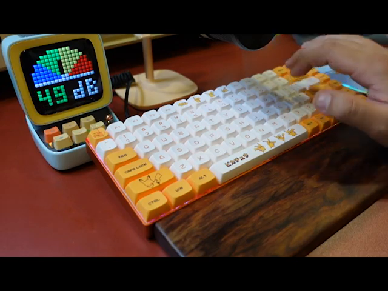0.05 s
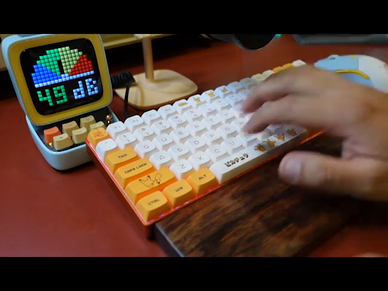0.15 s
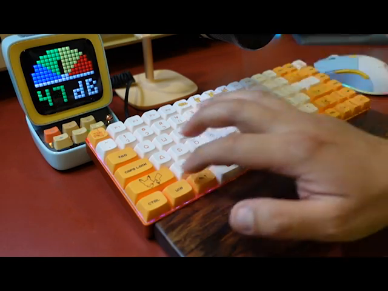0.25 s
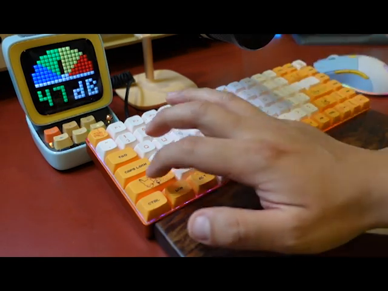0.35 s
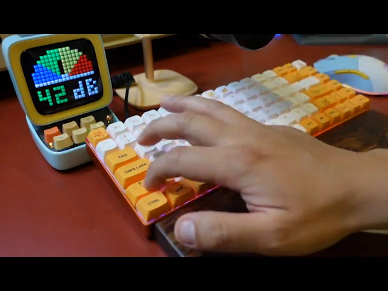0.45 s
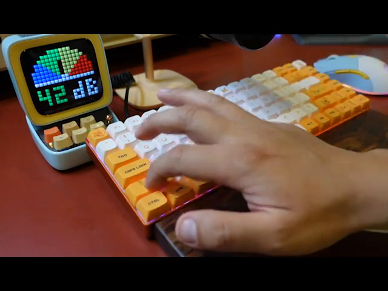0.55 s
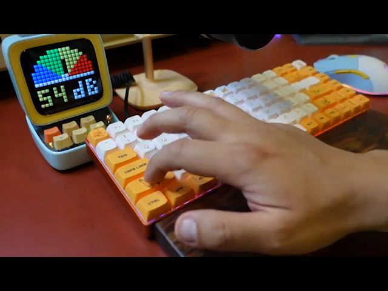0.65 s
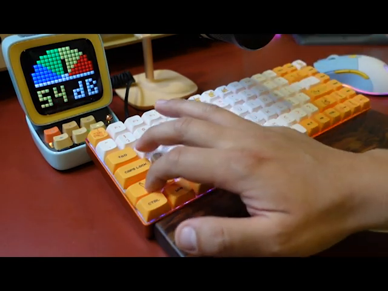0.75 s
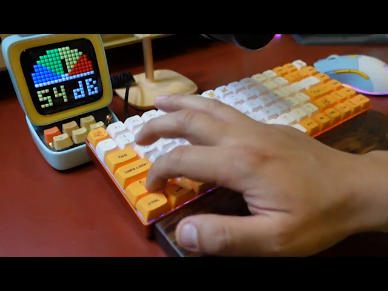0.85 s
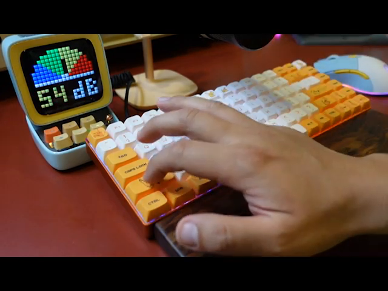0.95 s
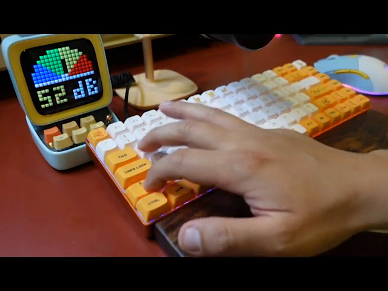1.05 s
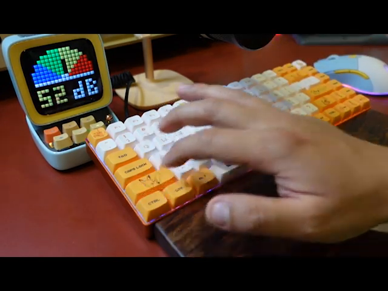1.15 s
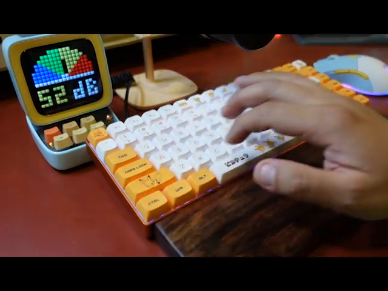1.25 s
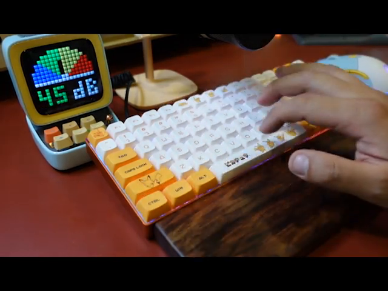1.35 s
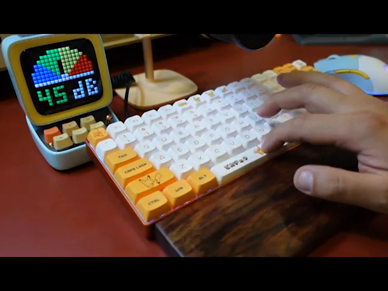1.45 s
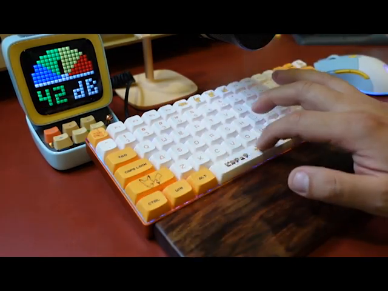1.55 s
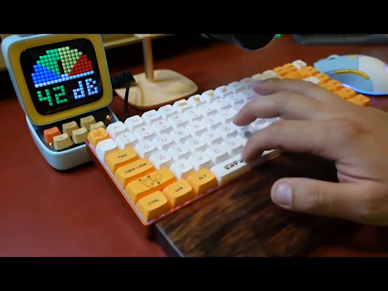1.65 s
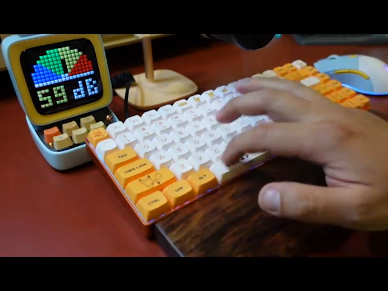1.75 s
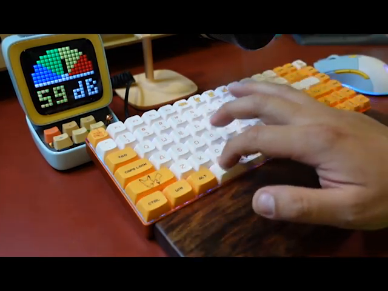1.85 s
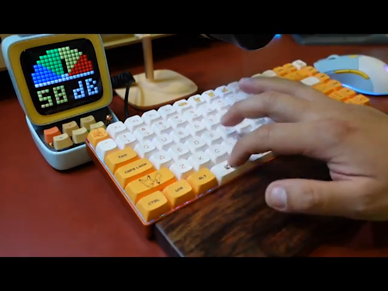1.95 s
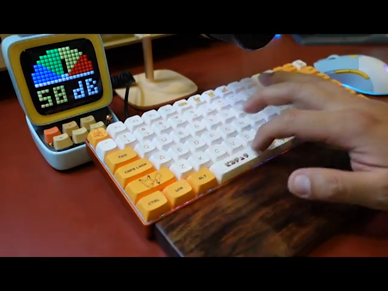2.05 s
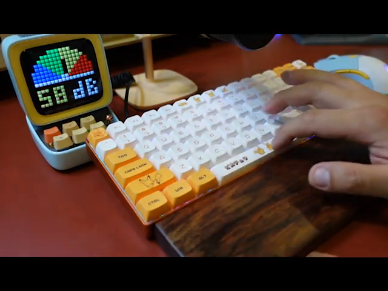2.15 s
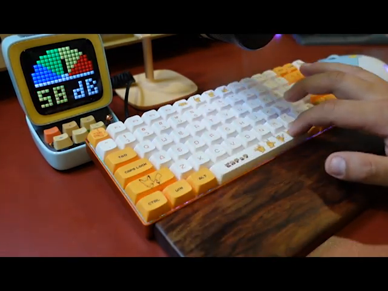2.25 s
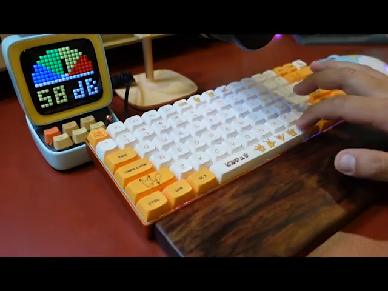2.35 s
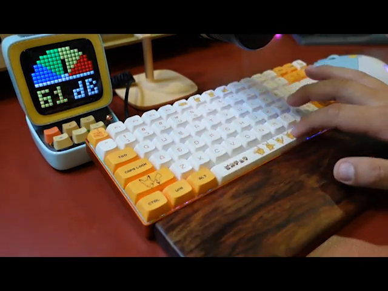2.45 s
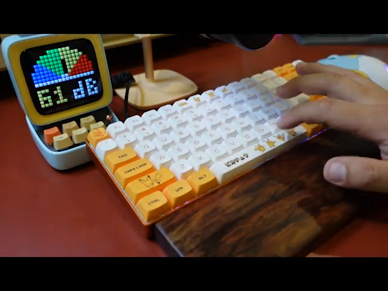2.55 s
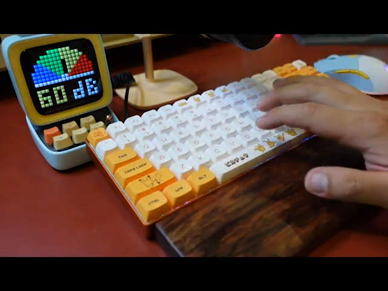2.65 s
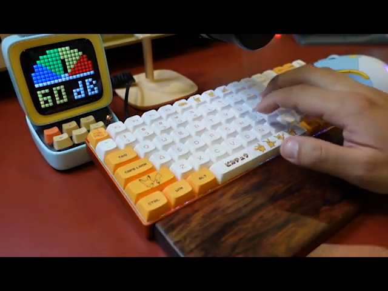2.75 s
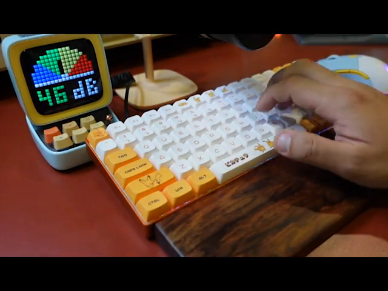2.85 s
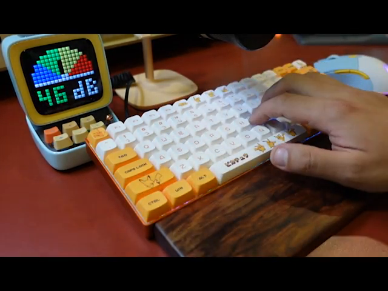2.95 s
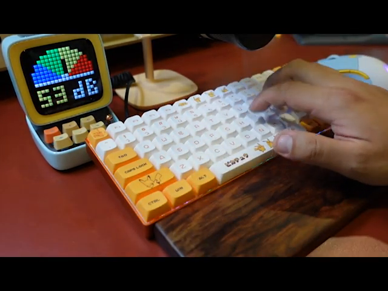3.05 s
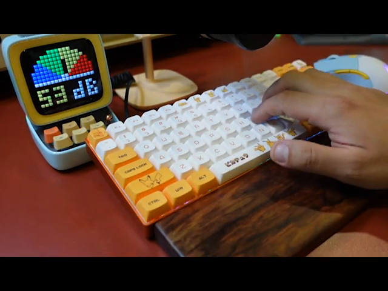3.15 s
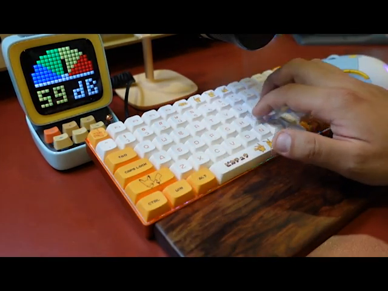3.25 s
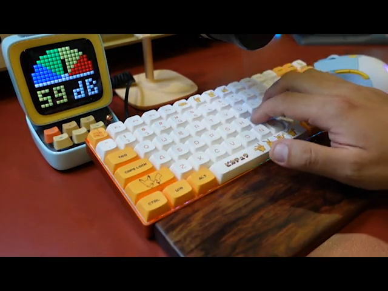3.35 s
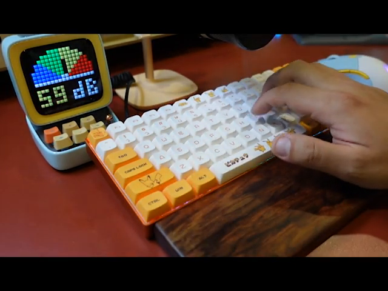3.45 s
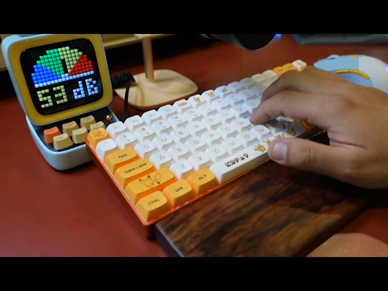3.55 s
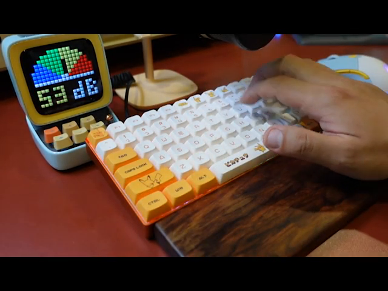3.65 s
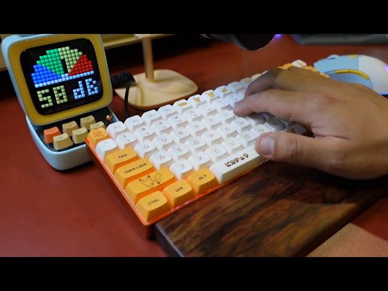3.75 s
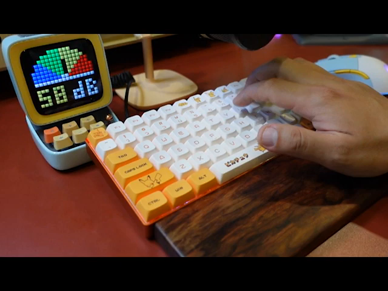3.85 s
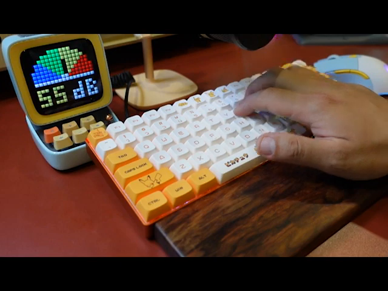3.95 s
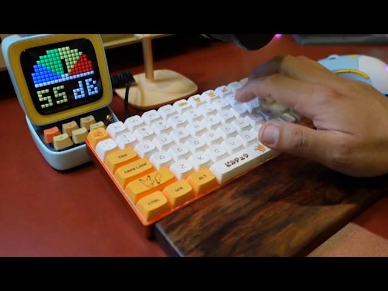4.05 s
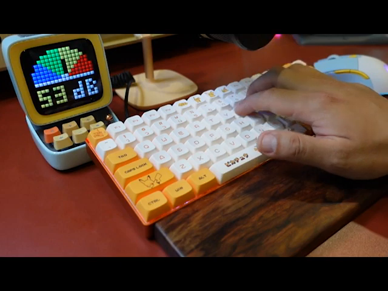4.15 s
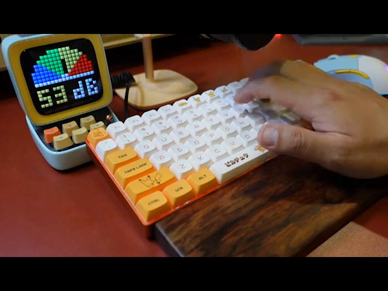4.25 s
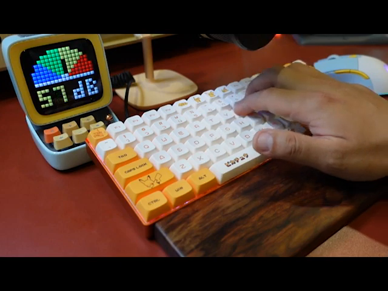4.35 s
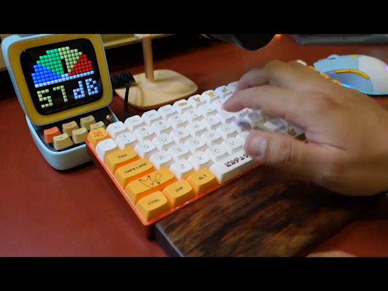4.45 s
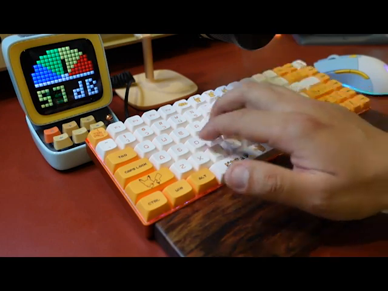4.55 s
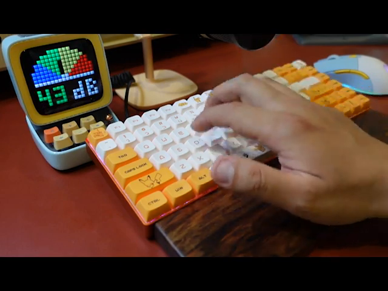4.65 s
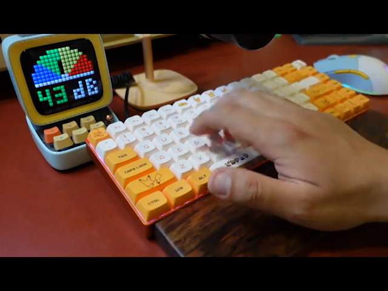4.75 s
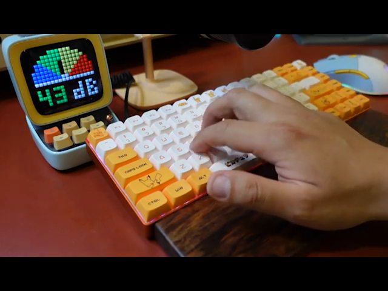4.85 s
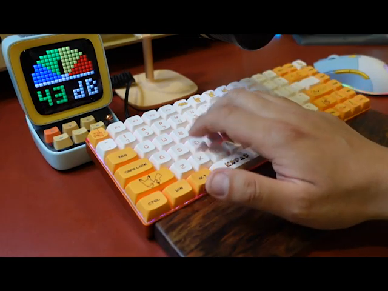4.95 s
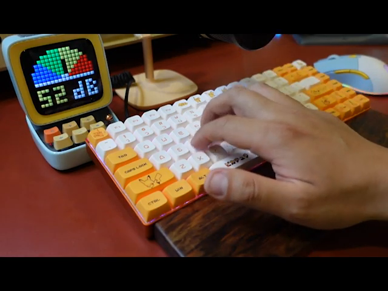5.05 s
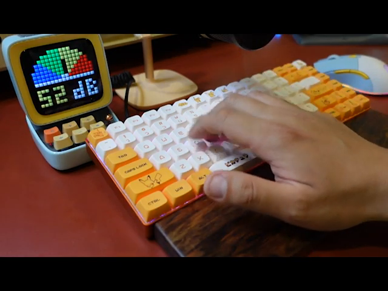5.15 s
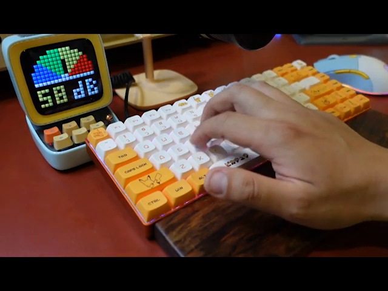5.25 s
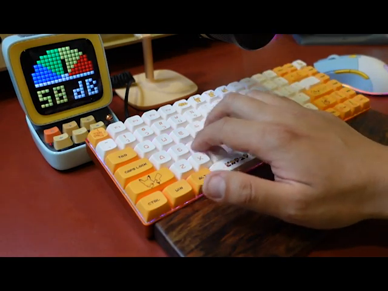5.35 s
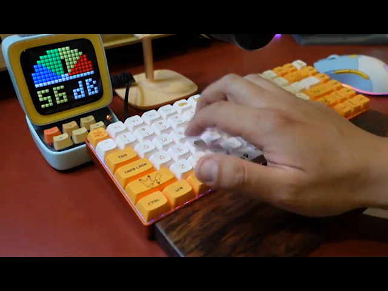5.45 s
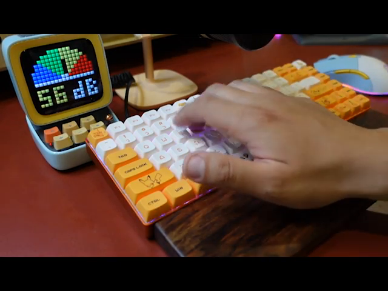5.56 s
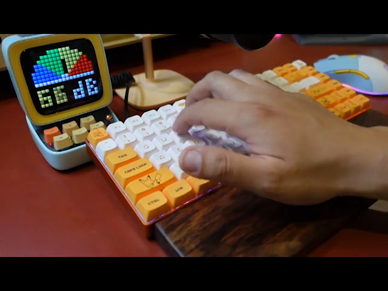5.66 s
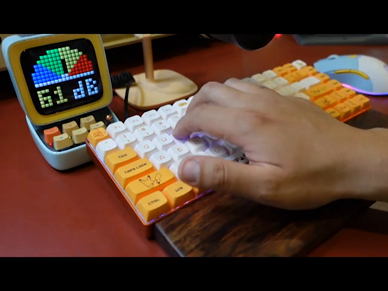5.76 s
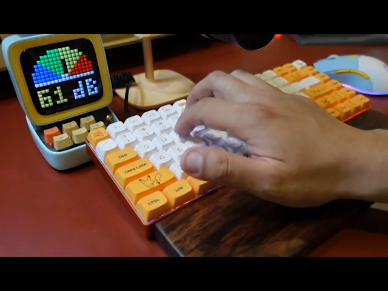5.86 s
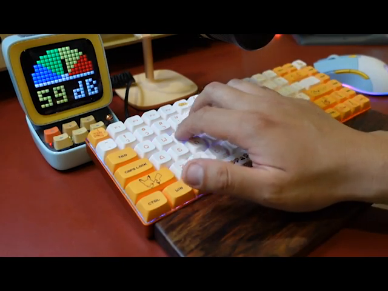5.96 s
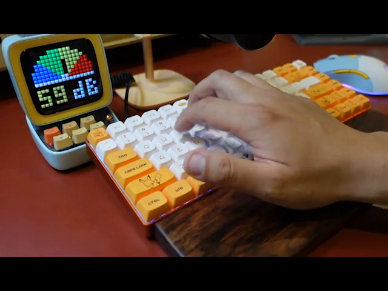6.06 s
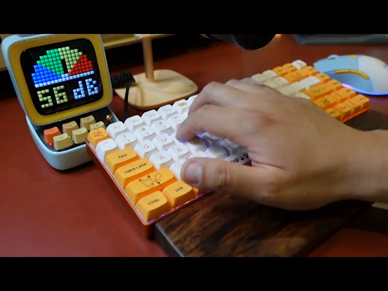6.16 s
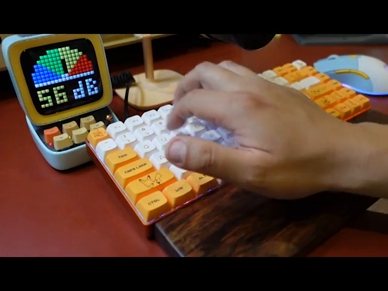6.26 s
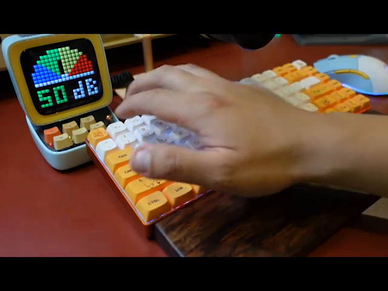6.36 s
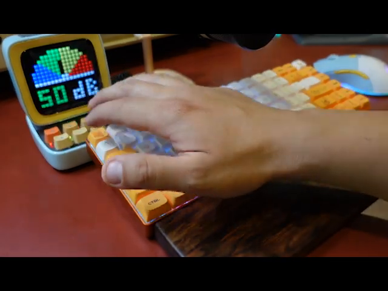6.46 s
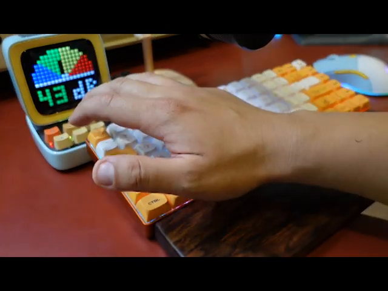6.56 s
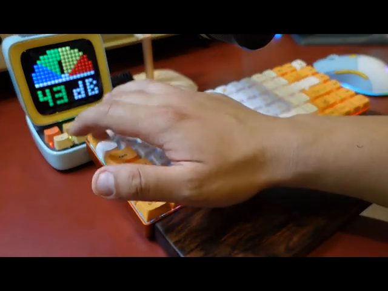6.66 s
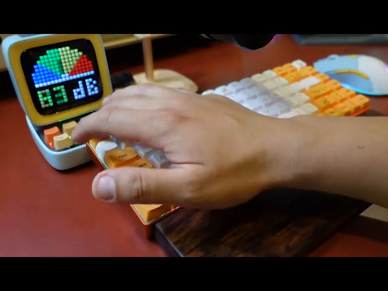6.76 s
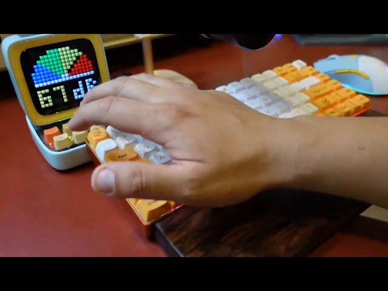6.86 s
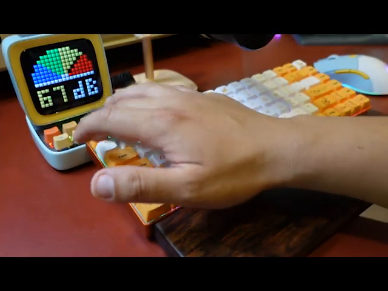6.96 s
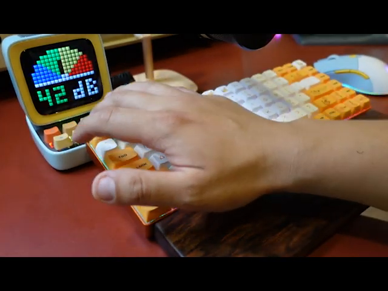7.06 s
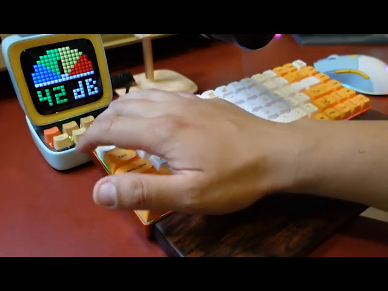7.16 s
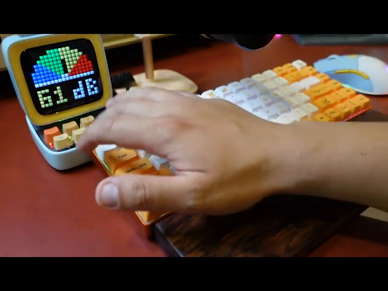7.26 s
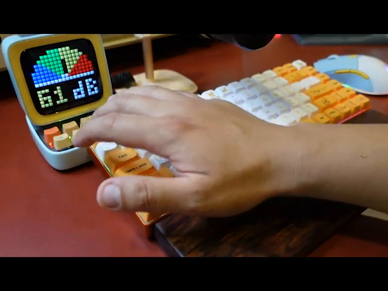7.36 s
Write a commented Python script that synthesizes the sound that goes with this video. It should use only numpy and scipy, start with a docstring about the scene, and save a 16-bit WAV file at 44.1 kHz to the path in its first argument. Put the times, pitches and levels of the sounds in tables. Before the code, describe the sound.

Close, crisp clacks of a mechanical keyboard: five single presses, seven hollow space bar thocks, rapid rolling bursts, then four firm taps.

```python
"""A wooden desk in a small quiet room: one hand taps a mechanical keyboard, close to the microphone.
A modifier key comes first, then the space bar, rolls across the letters, and a corner key.
Every landing and return is a short plastic clack: shaped noise that rings cap, switch spring and case.
Decaying low swings bounce the keyboard on the desk, faintly or firmly; echoes and a low hush fill the room."""
import sys
import numpy as np
from scipy import signal
from scipy.fft import rfft, irfft
from scipy.io import wavfile
from scipy.ndimage import uniform_filter1d

SR = 44100
rng = np.random.default_rng(int(sys.argv[2]) if len(sys.argv) > 2 else 0)


def waveform_to_disk(signal):
    """Save audio, clipped to [-1, 1], as 16-bit WAV at the path in sys.argv[1]."""
    frames = np.transpose(np.atleast_2d(signal))
    scaled = np.clip(frames, -1, 1) * 32767
    samples = np.round(scaled).astype(np.int16)
    wavfile.write(sys.argv[1], SR, samples)


N = 326781
TAPS = 8192  # length of one impact [samples]

# How the small contacts sound, as lifts on the key's body:
# (cap wall [dB], snap [dB], tick [dB], sizzle [dB], cap top [Hz], cap wall [Hz],
#  knock re strength [dB], kind of contact)
SMALL_VOICES = [(-3, -3, 2, 13, 1300, 1750, -15, "graze"),
                (-17, -5.5, -3, -7.5, 1160, 2200, -10, "bar end")]


def amp(db):
    """Decibels to gain."""
    return 10 ** (np.asarray(db) / 20)


def read(points, hz):
    """A table of (frequency [Hz], value), joined by lines on a log-frequency axis."""
    f, value = np.transpose(points)
    return np.interp(np.log(hz + 1), np.log(f + 1), value)


def unit(x):
    """Scales a sound to energy 1."""
    return x / np.sqrt(np.sum(x ** 2) + 1e-20)


def add(mix, s, sound):
    """Mixes a sound in at time s."""
    part = mix[max(round(s * SR), 0):][:len(sound)]
    part += sound[:len(part)]


def bell(hz, centre_hz, width_hz):
    """The shape of one resonance, 1 at its centre."""
    return 1 / (1 + ((hz - centre_hz) / width_hz) ** 2)


def causal(db):
    """The minimum-phase response with these gains: a sharp front, ringing behind it."""
    cepstrum = irfft(np.log(amp(np.maximum(db, -100))))
    # fold the cepstrum onto positive time
    cepstrum[1:TAPS // 2] *= 2
    cepstrum[TAPS // 2 + 1:] = 0
    return np.exp(rfft(cepstrum))


def burst(t60, rise_s=1e-5):
    """Dying noise of energy 1: a crowd of small modes or rattles."""
    t = np.arange(TAPS) / SR
    envelope = amp(-60 * t / t60) * (1 - np.exp(-t / rise_s))
    return unit(rng.standard_normal(TAPS) * envelope)


def hush():
    """Low steady noise of the room: random noise given a fixed spectrum."""
    # spectrum of the hush: (frequency [Hz], relative level [dB per Hz])
    hush_colour = [(12, -40.5), (20, 0), (101, -6.5), (158, -14.5), (198, -5.5), (222, -12.5), (357, -21.5),
                   (410, -16.5), (446, -25.5), (485, -17), (678, -17.5), (738, -20.5), (2260, -28),
                   (4940, -45.5), (16000, -49.5)]
    level_db = -53  # rms
    hz = np.fft.rfftfreq(N, 1 / SR)
    noise = irfft(rfft(rng.standard_normal(N)) * amp(read(hush_colour, hz)), N)
    return amp(level_db) * np.sqrt(N) * unit(noise)


def opening_ring(thump_db, thump_hz, thump_t60, air_db, air_t60):
    """Desk and room still ring from a stroke just before the scene opens: a dying tone and dying noise."""
    t = np.arange(N) / SR
    band = signal.butter(1, [300, 3000], "bandpass", fs=SR, output="sos")
    air = signal.sosfilt(band, rng.standard_normal(N))
    air = signal.sosfilt(signal.butter(2, 4500, fs=SR, output="sos"), air)
    thump = amp(thump_db - 60 * t / thump_t60) * np.sin(2 * np.pi * thump_hz * t)
    return thump + amp(air_db - 60 * t / air_t60) * air


def of_key(table, key):
    """The numbers that a table holds for one key."""
    return next(row[:-1] for row in table if row[-1] == key)


def impact(s, strength_db, hardness_db, thump_db, voice, key):
    """One contact from voice and force: (time, clack's level, colour and pitches, knock, thump)."""
    # the switch under each key: (spring [Hz], contact leaf [Hz], key)
    switches = [(3490, 11500, "modifier"), (2760, 11100, "space"), (6730, 11000, "corner"),
                (8000, 11100, "letter 1a"), (8280, 11850, "letter 1b"), (6980, 10950, "letter 1c"),
                (8060, 11550, "letter 2a"), (8400, 11700, "letter 2b"), (8270, 11800, "letter 2c"),
                (8200, 11400, "letter 3a"), (7400, 10810, "letter 3b"), (8270, 11600, "letter 3c"),
                (8230, 11780, "letter 4a"), (8220, 11400, "letter 4b"), (8200, 11400, "letter 4c")]
    # the finger never meets the same spot twice: scatter of cap pitch [share] and colour [dB]
    spot_detune, spot_db = .015, .8
    *colour_db, top_hz, wall_hz, knock_db = voice
    # a hard stroke lifts the treble fully, the cap wall only in part
    hardness_share = np.array([.3, 1, 1, 1])
    colour_db = np.add(colour_db, hardness_db * hardness_share)
    colour_db = colour_db + spot_db * rng.standard_normal(len(colour_db))
    cap_hz = np.array([top_hz, wall_hz]) * (1 + spot_detune * rng.standard_normal(2))
    knock_db = strength_db + knock_db + hardness_db / 2
    return s, strength_db, *colour_db, *cap_hz, *of_key(switches, key), knock_db, thump_db


def typing(kind, return_thump_db, graze_thump_db=-32):
    """Contacts of one kind of key: each stroke bottoms out and springs back; some follow a nail's graze."""
    # Keystrokes. Three fingers roll over letters a, b, c, four times in each of four hand positions:
    # (time [s], strength [dB], hardness [dB], relative desk thump [dB],
    #  return time [s], return strength [dB], key)
    strokes = [(.4195, 10.5, 2, -28, .4961, 7, "modifier"), (.5666, 13, 2, -25.5, .6461, 8, "modifier"),
               (.72, 11, -2, -28, .7966, 7.5, "modifier"), (.871, 9, -1, -29.5, .9374, 7.5, "modifier"),
               (1.0039, 13, 0, -25.5, 1.0894, 10, "modifier"), (1.4562, 10, -3, -23.5, 1.541, 5, "space"),
               (1.6325, 9, -3.5, -22, 1.6942, 10, "space"), (1.7837, 8.5, 9, -21, 1.8663, 8.5, "space"),
               (1.9462, 9.5, 3, -22.5, 2.0361, 9, "space"), (2.1243, 9.5, -2.5, -22, 2.1969, 6, "space"),
               (2.2777, 11, -3.5, -24, 2.348, 6, "space"), (2.4405, 11, 3, -20, 2.5218, 8, "space"),
               (2.8909, 14, -2, -34, 2.9872, 5.5, "letter 1a"),
               (2.9098, 10.5, 2, -26, 3.0066, 5, "letter 1b"),
               (2.9386, 14.5, -2, -30, 3.0293, 13.5, "letter 1c"),
               (3.099, 13.5, -2, -27, 3.185, 13, "letter 1a"),
               (3.1224, 9.5, 3, -24.5, 3.1973, 6.5, "letter 1b"),
               (3.1422, 19, 2, -30, 3.2401, 10.5, "letter 1c"),
               (3.3068, 14.5, 0, -29, 3.3801, 12, "letter 1a"),
               (3.318, 12, -3, -26, 3.393, 6.5, "letter 1b"),
               (3.349, 13, -1.5, -31.5, 3.423, 9, "letter 1c"),
               (3.4837, 15.5, 4, -31.5, 3.5666, 11, "letter 1a"),
               (3.4989, 10.5, -1.5, -30.5, 3.5819, 5.5, "letter 1b"),
               (3.527, 17.5, 0, -24, 3.619, 11, "letter 1c"),
               (3.704, 12.5, -1, -35, 3.7808, 12, "letter 2a"),
               (3.725, 7.5, 2, -26, 3.8031, 6.5, "letter 2b"),
               (3.7507, 14.5, 0, -26.5, 3.8243, 9, "letter 2c"),
               (3.9036, 10.5, -3, -30, 3.9698, 8.5, "letter 2a"),
               (3.9168, 2.5, 1, -33, 3.9862, 8.5, "letter 2b"),
               (3.9309, 17, 1, -23.5, 4.007, 11.5, "letter 2c"),
               (4.096, 12, 2, -37, 4.1677, 12.5, "letter 2a"),
               (4.1129, 8.5, 1, -26.5, 4.1798, 5.5, "letter 2b"),
               (4.1379, 10.5, 0, -28, 4.2065, 9, "letter 2c"),
               (4.2785, 13.5, 1, -30.5, 4.3542, 9, "letter 2a"),
               (4.2914, 8.5, -5, -38, 4.3654, 4, "letter 2b"),
               (4.313, 17.5, -.5, -26, 4.3926, 10, "letter 2c"),
               (4.7497, 8.5, 1, -30.5, 4.8336, 7.5, "letter 3a"),
               (4.778, 14.5, -1, -33, 4.8547, 6.5, "letter 3b"),
               (4.798, 4.5, -6, -33, 4.8694, 9, "letter 3c"),
               (4.9596, 5.5, 1, -37.5, 5.0258, 7.5, "letter 3a"),
               (4.9782, 11, 1, -25.5, 5.0358, 9, "letter 3b"),
               (4.9887, 16, 1, -27, 5.0647, 13, "letter 3c"), (5.148, 5, -4, -27, 5.2145, 9, "letter 3a"),
               (5.161, 14.5, -1, -39, 5.227, 12.5, "letter 3b"),
               (5.1898, 10.5, -1, -41, 5.247, 12.5, "letter 3c"),
               (5.3214, 5.5, 1, -30, 5.405, 6, "letter 3a"), (5.339, 11, 1, -32, 5.414, 11, "letter 3b"),
               (5.359, 15, 5, -27, 5.439, 14, "letter 3c"), (5.5405, 10, 2.5, -29, 5.6187, 7, "letter 4a"),
               (5.5556, 12, 2, -24.5, 5.6325, 9.5, "letter 4b"),
               (5.5837, 8, -3.5, -29.5, 5.6458, 7, "letter 4c"),
               (5.7334, 5.5, -1.5, -40, 5.8092, 8, "letter 4a"),
               (5.7426, 11, 0, -25, 5.822, 10.5, "letter 4b"), (5.7635, 13, 4, -32, 5.8407, 3, "letter 4c"),
               (5.926, 7, 1, -42, 5.9974, 9.5, "letter 4a"),
               (5.9362, 11, -1.5, -24, 6.0062, 9, "letter 4b"),
               (5.9573, 6, -3.5, -36, 6.0284, 9, "letter 4c"),
               (6.1036, 9.5, -1.5, -31, 6.1891, 7.5, "letter 4a"),
               (6.1216, 5, -11, -61, 6.2036, 8.5, "letter 4b"),
               (6.1429, 11.5, 3.5, -23.5, 6.2324, 6.5, "letter 4c"),
               (6.6776, 18.5, 0, -35.5, 6.7623, 9.5, "corner"),
               (6.9581, 20.5, 1.5, -33.5, 7.0306, 8.5, "corner"),
               (7.1131, 14, -2, -39, 7.1809, 10.5, "corner"), (7.2699, 18, 0, -33, 7.3392, 12.5, "corner")]
    # a fingernail grazes a cap before the stroke: (time [s], strength [dB], key)
    grazes = [(1.7716, -11, "space"), (2.2561, -11, "space"), (2.4262, -7, "space"),
              (3.1337, -5, "letter 1c"), (3.2915, -9, "letter 1a"), (3.3346, -8, "letter 1c"),
              (3.4715, -8, "letter 1a"), (3.5156, -9, "letter 1c"), (4.7352, -5, "letter 3a"),
              (4.7655, -10, "letter 3b"), (4.9416, -6, "letter 3a"), (5.3037, -5, "letter 3a"),
              (5.3487, -8, "letter 3c"), (6.6698, -9, "corner")]
    # how each key sounds as it bottoms out, as lifts on its body:
    # (cap wall [dB], snap [dB], tick [dB], sizzle [dB], cap top [Hz], cap wall [Hz],
    #  knock re strength [dB], key)
    down_voices = [(3.5, 7, 1.5, 4, 1170, 1950, -24, "modifier"),
                   (1.5, 5.5, 5, 1.5, 1560, 1895, -12.5, "space"),
                   (4, 1.5, -.5, 0, 1232, 1910, -40, "corner"),
                   (-7, 3.5, -5, -9, 1135, 2150, -34, "letter 1a"),
                   (2, 12, 7.5, 6.5, 1210, 2200, -25, "letter 1b"),
                   (-3, 0, 1, -1, 1230, 2210, -34, "letter 1c"), (2, 2, 1, 3, 1055, 2170, -32, "letter 2a"),
                   (0, 9.5, -6, 3, 1015, 2140, -20, "letter 2b"),
                   (3, 3, 3.5, 7, 1200, 2090, -33, "letter 2c"),
                   (2, 2, -8, -1.5, 1330, 2250, -27, "letter 3a"),
                   (.5, 3, 4, 4, 1095, 2330, -38, "letter 3b"),
                   (-5, -5, -7, -8, 1425, 1880, -36, "letter 3c"),
                   (6, 7, 6, 8, 1150, 2200, -27, "letter 4a"),
                   (7.5, 8, 8, 11, 1130, 2220, -28, "letter 4b"),
                   (3, 10, 7, 8, 1020, 2100, -29, "letter 4c")]
    # as it springs back against its top stop:
    # (cap wall [dB], snap [dB], tick [dB], sizzle [dB], cap top [Hz], cap wall [Hz],
    #  knock re strength [dB], key)
    up_voices = [(2, 1.5, -2, -1.5, 1190, 1950, -17, "modifier"), (.5, 5, 0, 0, 1130, 2300, -9.5, "space"),
                 (.5, 1.5, 0, .5, 1310, 1905, -32, "corner"),
                 (-16, -8, -6, -14, 1080, 1900, -33, "letter 1a"),
                 (.5, 1, 0, 2, 1190, 2190, -26, "letter 1b"), (1, 1, -1, 1, 1290, 2190, -26, "letter 1c"),
                 (-1, -11, 0, -2, 1075, 2100, -32, "letter 2a"),
                 (2.5, 1, 5, 4.5, 1050, 2080, -24, "letter 2b"),
                 (.5, -1, 1.5, 5, 1160, 1990, -26.5, "letter 2c"),
                 (1.5, 5, 4, 6, 1330, 2220, -28, "letter 3a"),
                 (-5, -7, -5.5, -9, 1065, 2200, -31, "letter 3b"),
                 (-4.5, -5.5, -4, -10.5, 1420, 1830, -41, "letter 3c"),
                 (4.5, 2.5, 4, 5.5, 1080, 2130, -31, "letter 4a"),
                 (3, 1, 2, -3, 1085, 2200, -37, "letter 4b"), (0, 2.5, 0, -3, 1050, 2200, -29, "letter 4c")]
    hits = []
    for s, strength_db, hardness_db, thump_db, up_s, up_db, key in strokes:
        if key.startswith(kind):
            hits.append(impact(s, strength_db, hardness_db, thump_db, of_key(down_voices, key), key))
            hits.append(impact(up_s, up_db, 0, up_db + return_thump_db, of_key(up_voices, key), key))
    for s, db, key in grazes:
        if key.startswith(kind):
            hits.append(impact(s, db, 0, db + graze_thump_db, of_key(SMALL_VOICES, "graze"), key))
    return hits


def bar_ends():
    """The dull second stop of the long space bar, after its near end has returned."""
    # the far end stops a moment after the near end:
    # (time [s], strength [dB], relative desk thump [dB])
    end_stops = [(1.5455, 0, -44.5), (1.7069, 7, -21.5), (1.8733, 1.5, -19.5), (2.0434, -3, -20),
                 (2.208, 2, -24), (2.3605, 5, -28), (2.535, 6, -26.5)]
    voice = of_key(SMALL_VOICES, "bar end")
    return [impact(s, db, 0, thump_db, voice, "space") for s, db, thump_db in end_stops]


def contact(chatter_db, chatter_t60, ring_db, ring_t60, rebound_db=-9, rebound_s=0.001276):
    """Spectrum of one impact: blow, rebound, stem chatter, plate ringing on. Flat on average."""
    force = amp(chatter_db) * burst(chatter_t60) + amp(ring_db) * burst(ring_t60)
    force[0] += 1  # the blow
    # the tilted cap lands on one edge, then on the other
    add(force, rebound_s * rng.uniform(.4, 1.626), amp(rebound_db + chatter_db) * burst(0.0028))
    z = rfft(force)
    power = uniform_filter1d(abs(z) ** 2, size=110)
    return z * causal(-10 * np.log10(power))


def clack(row, body, touch, spring_db, spring_t60, spring_width_hz, shimmer_db, slide_db):
    """One impact on a key: body-coloured noise with a spring ping, and the stem's faint slide before it."""
    strength_db, wall_db, snap_db, tick_db, sizzle_db, top_hz, wall_hz, spring_hz, leaf_hz = row
    hz = np.fft.rfftfreq(TAPS, 1 / SR)
    # a hard, square hit is brighter than a soft or glancing one
    hardness = [(1400, 0), (2000, wall_db), (2500, wall_db), (3400, snap_db), (5000, snap_db),
                (7000, tick_db), (9000, tick_db), (11000, sizzle_db - 1.5), (15000, sizzle_db + 9)]
    leaf = bell(hz, leaf_hz, 350)
    cap = 6 * bell(hz, top_hz, 91) + 5 * bell(hz, wall_hz, 170)
    modes = cap + 5 * bell(hz, spring_hz, 250) + 3 * leaf
    # each spot of a cap favours other small modes, more so in the treble
    ripple = uniform_filter1d(rng.standard_normal(len(hz)), size=121) * np.sqrt(121)
    spot_db = 0.62 * ripple * hz / (hz + 2500)
    small_source = read([(30, -37), (200, -6.5), (500, -0.5)], hz)  # a cap radiates little bass
    colour = causal(strength_db + read(body, hz) + read(hardness, hz) + modes + spot_db + small_source)
    # the springs ring on: one main cluster, and a thin shimmer of higher modes around the contact leaf's
    treble = hz ** 2 / (hz ** 2 + 5000 ** 2)
    springs = amp(spring_db) * bell(hz, spring_hz, spring_width_hz)
    springs = springs + amp(shimmer_db) * (treble + .3 * leaf)
    hit = irfft(colour * (contact(*touch) + springs * rfft(burst(spring_t60, rise_s=0.0049))))
    slide = irfft(colour * (1 + 4.2 * treble ** 3) * rfft(burst(0.065, rise_s=0.0061)))
    fade = np.clip(np.linspace(5, -1, TAPS), 0, 1)  # full for two thirds, silent in the last sixth
    return fade * hit, fade * amp(slide_db) * slide


def keys(hits, body, level_db, chatter_db, chatter_t60, ring_db, ring_t60, **small_parts):
    """All the clacks of one kind of key, each slide starting 17 ms ahead of its hit."""
    out = np.zeros(N)
    touch = (chatter_db, chatter_t60, ring_db, ring_t60)
    for s, *row, _, _ in hits:
        hit, slide = clack(row, body, touch, **small_parts)
        add(out, s, hit)
        add(out, s - .017, slide)
    return amp(level_db) * out


def knocks(hits, modes, level_db, rise_s, lowest_hz):
    """The hollow knock under a clack: dying sines; the place of the hit shifts the mix of the modes."""
    out, t = np.zeros(N), np.arange(SR // 4) / SR
    for s, *_, knock_db, _ in hits:
        chance = rng.standard_normal((len(modes), 2))
        ring = np.zeros(len(t))
        for (hz, db, t60), (level_shift, detune) in zip(modes, chance):
            tone = np.sin(2 * np.pi * hz * (1 + 0.03 * detune) * t)
            ring += amp(db + 2 * level_shift - 60 * t / t60) * tone
        add(out, s, amp(level_db + knock_db) * unit(ring * (1 - np.exp(-t / rise_s))))
    # below its lowest mode the body hardly radiates
    return signal.sosfilt(signal.butter(6, lowest_hz, "highpass", fs=SR, output="sos"), out)


def desk(hits, level_db, steepness):
    """The finger's weight follows the clack and swings the keyboard on the desk: low modes swell and die."""
    # modes of the keyboard on the desk: (frequency [Hz], level [dB], time until the swing is widest [s])
    desk_modes = [(90.44, 0, 0.02534), (73.5, -18, .018), (54.6, -10, 0.027038), (35, -21, .03)]
    out, t = np.zeros(N), np.arange(SR // 4) / SR
    swing = np.zeros(len(t))
    for hz, db, top in desk_modes:
        swell = (t / top * np.exp(1 - t / top)) ** steepness
        swing += amp(db) * swell * np.cos(2 * np.pi * hz * (t - top))
    for s, *_, thump_db in hits:
        add(out, s, amp(level_db + thump_db) * swing)
    return out


def room(x, wet_db, near_db):
    """Early echoes off the desk and the things on it, then a diffuse tail: convolution with dying noise."""
    # decay of the tail: (frequency [Hz], t60 [s])
    tail_t60 = [(100, 2.2), (500, 0.6), (1500, 0.65), (4000, 0.3), (9000, 0.23), (16000, .2)]
    # colour of the tail: (frequency [Hz], level [dB])
    tail_colour = [(60, -10.5), (250, 3), (600, 3), (1200, -4), (2200, -2.5), (4000, 1.5), (8000, 5),
                   (15000, -5)]
    t = np.arange(SR // 2) / SR
    tail = unit(rng.standard_normal(len(t)) * (1 - np.exp(-(t / 0.011) ** 2)))
    hz, when, z = signal.stft(tail, SR, nperseg=256)
    z *= amp(read(tail_colour, hz)[:, None] - 60 * when / read(tail_t60, hz)[:, None])
    echo = amp(wet_db) * signal.istft(z, SR, nperseg=256)[1]
    add(echo, .003, amp(near_db) * burst(0.098))  # the early echoes, as one dense burst
    return signal.fftconvolve(x, echo)[:N]


def scene():
    """Keys, case and desk in the room."""
    # the body of each kind of key: (frequency [Hz], level [dB])
    modifier_body = [(560, -13), (750, -4.5), (1150, 2.5), (1400, -3.5), (2000, -13), (2600, -19.5),
                     (3500, -12), (4200, -20), (4800, -25.5), (6300, -30.5), (7500, -32), (11800, -36.5),
                     (13000, -45), (15500, -60)]
    space_body = [(560, -3), (850, -2.8), (1100, 2.5), (1400, -1.5), (1900, 4), (2800, -2), (3800, -12),
                  (4600, -17), (5500, -25), (7000, -31.5), (9500, -29.5), (12000, -29), (15500, -48)]
    letter_body = [(560, -17), (750, -12), (1050, 2), (1350, 0), (1650, -8.2), (2200, -3.5), (2900, -13.5),
                   (4000, -13), (5200, -22.5), (6300, -35.5), (7800, -17.5), (11700, -27.5), (13200, -40.5),
                   (15500, -52.5)]
    corner_body = [(560, -16), (900, -7.5), (1300, 0.0), (1650, -10.5), (1950, -7), (2400, -21),
                   (3200, -18), (4300, -24.5), (6000, -34), (8300, -32.7), (9600, -39), (11200, -31),
                   (12500, -55), (15500, -61)]
    # modes of the long space bar and the hollow under it: (frequency [Hz], level [dB], t60 [s])
    space_bar = [(255, -4, 0.098), (289.59, -2, 0.052), (338, 2, 0.032), (385, -1, 0.026),
                 (504, -3.5, 0.0242), (756, -2, 0.017)]
    # modes of the keyboard case: (frequency [Hz], level [dB], t60 [s])
    case = [(174, -4, 0.024), (248.2, -7.5, 0.09), (282, -5, 0.044), (388, 0.5, 0.031), (568, -2, 0.022)]
    modifier = typing("modifier", return_thump_db=-43)
    space = typing("space", return_thump_db=-31) + bar_ends()
    letters = typing("letter", return_thump_db=-48)
    corner = typing("corner", return_thump_db=-50)
    dry = keys(modifier, modifier_body, level_db=0, chatter_db=5, chatter_t60=0.013, ring_db=-9.5,
               ring_t60=0.039, spring_db=-39, spring_t60=0.21, spring_width_hz=200, shimmer_db=-11,
               slide_db=-33)
    dry += keys(space, space_body, level_db=-0.5, chatter_db=-3, chatter_t60=0.0078, ring_db=-15.5,
                ring_t60=.03, spring_db=-48, spring_t60=.35, spring_width_hz=610, shimmer_db=-11.5,
                slide_db=-29.5)
    dry += keys(letters, letter_body, level_db=-0.5, chatter_db=4, chatter_t60=0.0077, ring_db=-10.5,
                ring_t60=0.025, spring_db=-24, spring_t60=0.54, spring_width_hz=200, shimmer_db=-29,
                slide_db=-34)
    dry += keys(corner, corner_body, level_db=0.5, chatter_db=3, chatter_t60=.007, ring_db=-8,
                ring_t60=0.042, spring_db=-16, spring_t60=.3, spring_width_hz=425, shimmer_db=-12.5,
                slide_db=-35)
    small_keys = modifier + letters + corner
    dry += knocks(space, space_bar, level_db=2.5, rise_s=0.0015, lowest_hz=241)
    dry += knocks(small_keys, case, level_db=-0.5, rise_s=0.0026, lowest_hz=120.6)
    dry += desk(small_keys + space, level_db=-1, steepness=2.92)
    opening = opening_ring(thump_db=-29.5, thump_hz=89, thump_t60=0.22, air_db=-41.5, air_t60=0.21)
    return (dry + room(dry, wet_db=-10.5, near_db=-21) + hush() + opening)[None]


def record(dry):
    """The recorder's band limit: a steep low-pass."""
    edge_hz = 16550
    lowpass = signal.firwin(255, edge_hz, window=("kaiser", 9), fs=SR)
    return signal.oaconvolve(dry, lowpass[None], "same")


dry = scene()
out = record(dry)
waveform_to_disk(out)
```